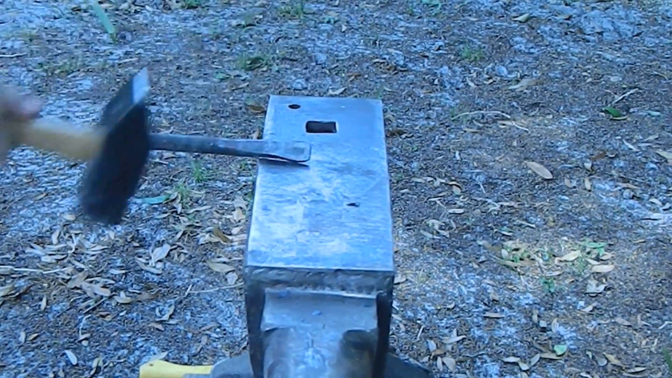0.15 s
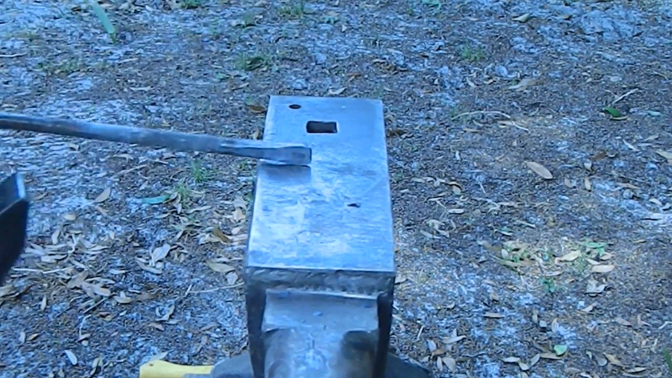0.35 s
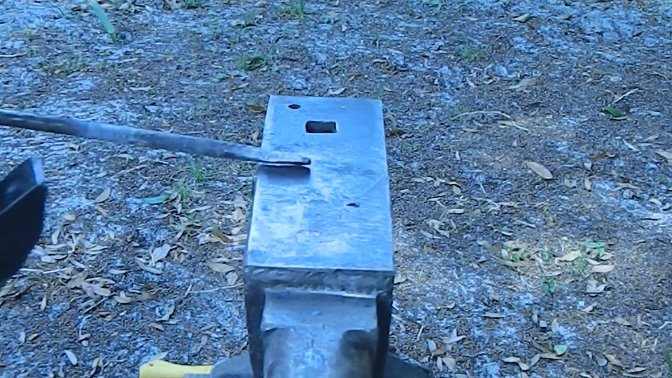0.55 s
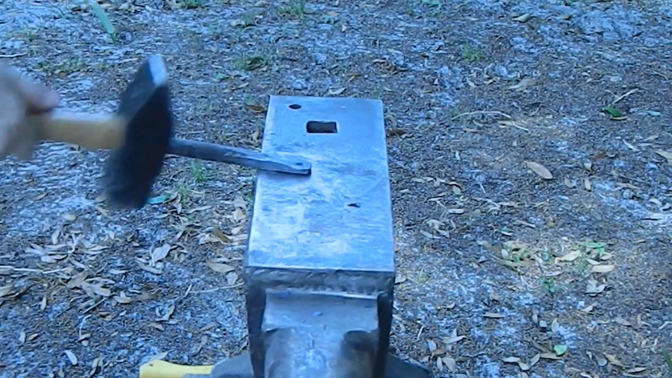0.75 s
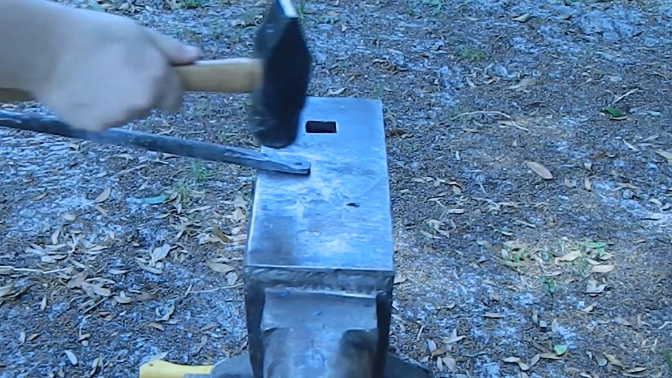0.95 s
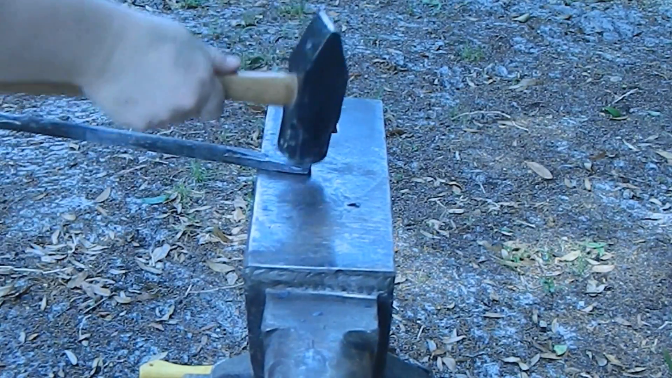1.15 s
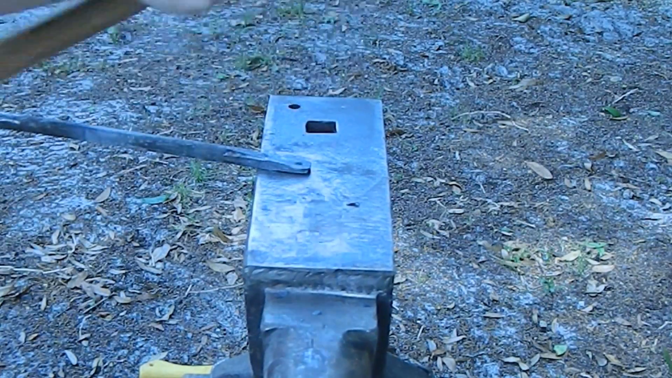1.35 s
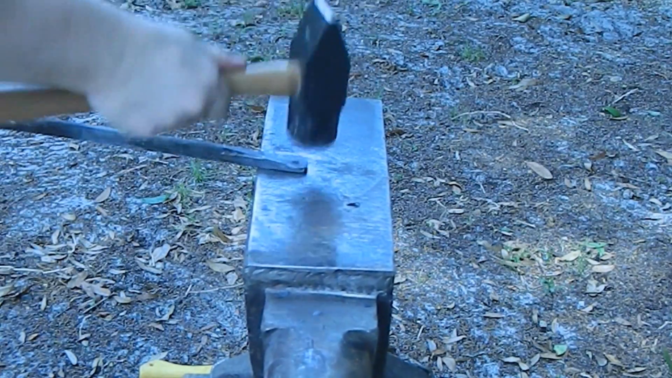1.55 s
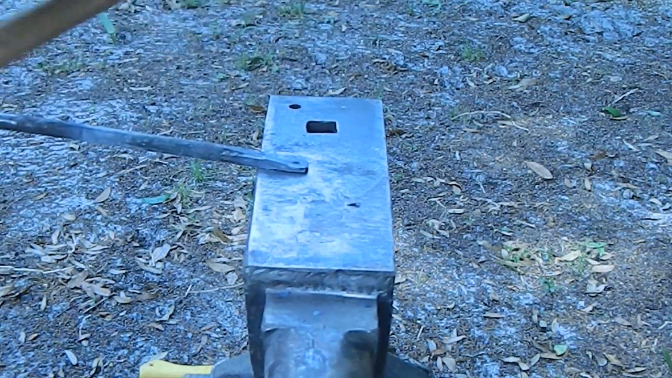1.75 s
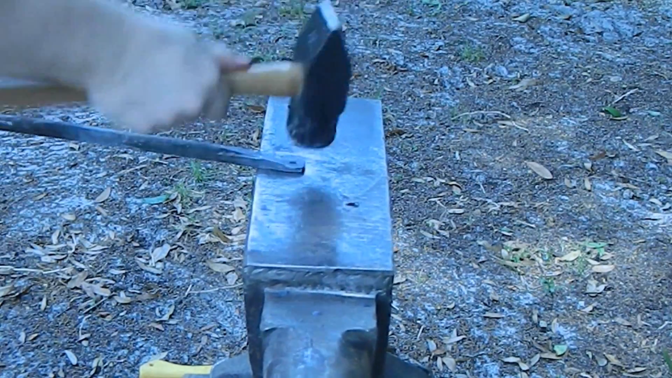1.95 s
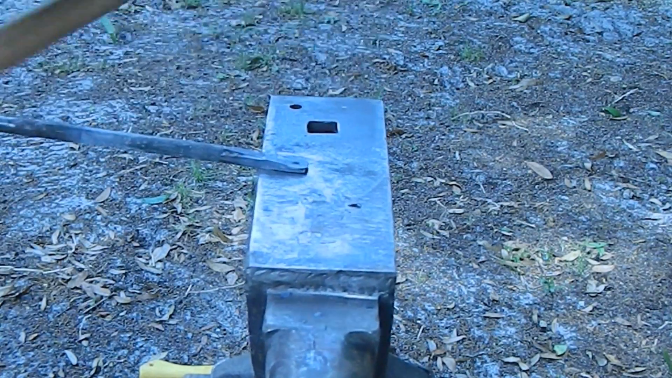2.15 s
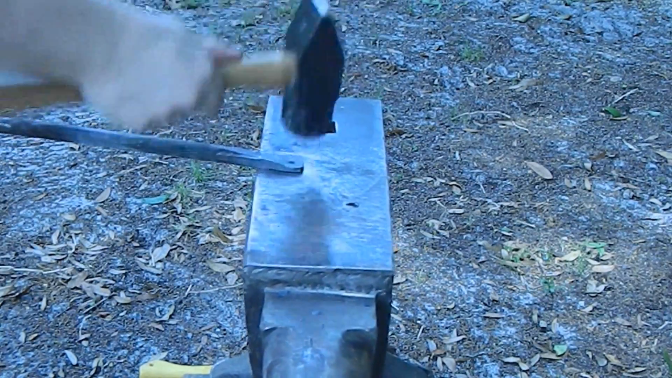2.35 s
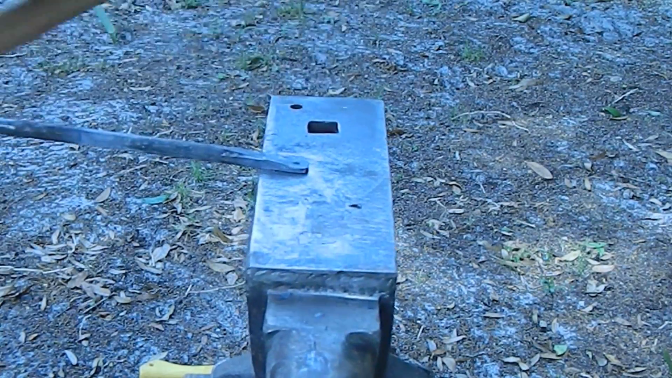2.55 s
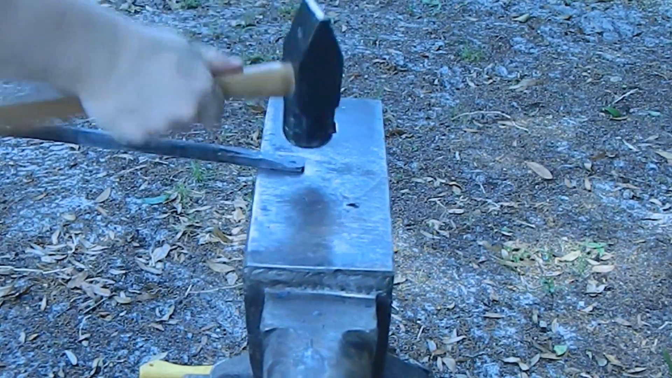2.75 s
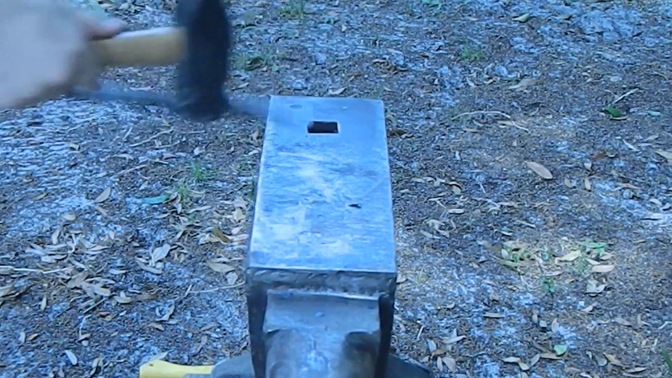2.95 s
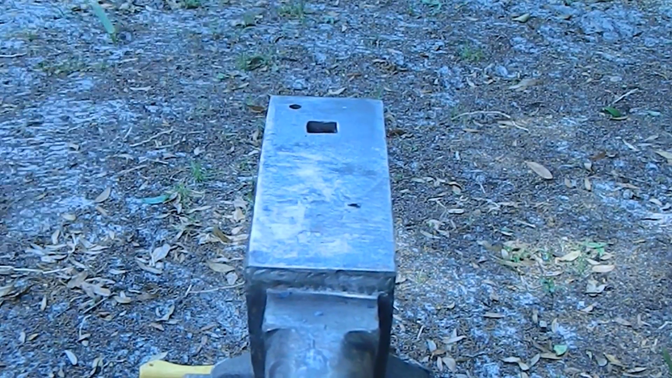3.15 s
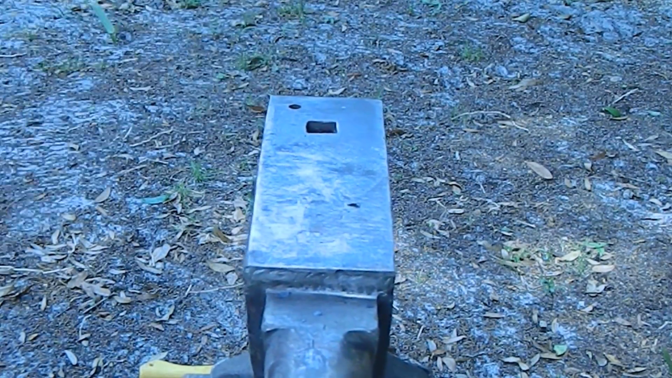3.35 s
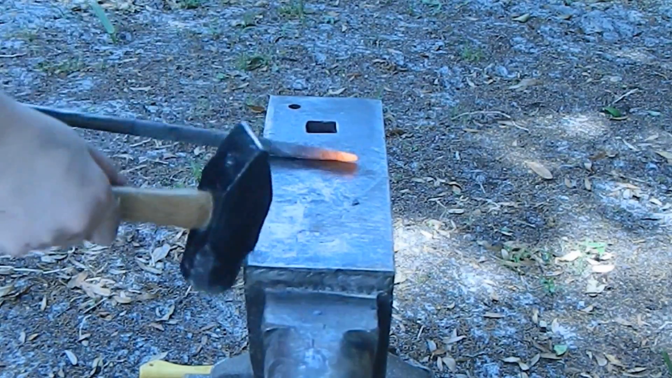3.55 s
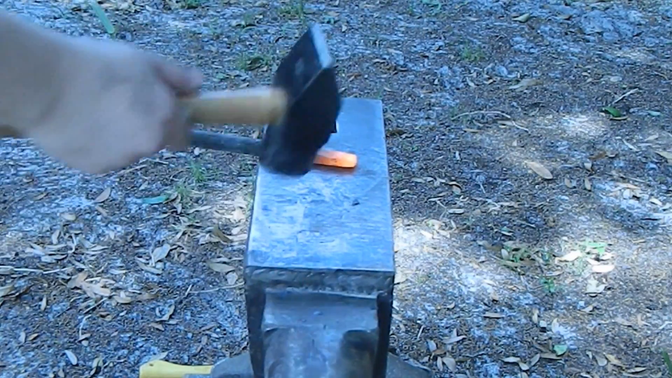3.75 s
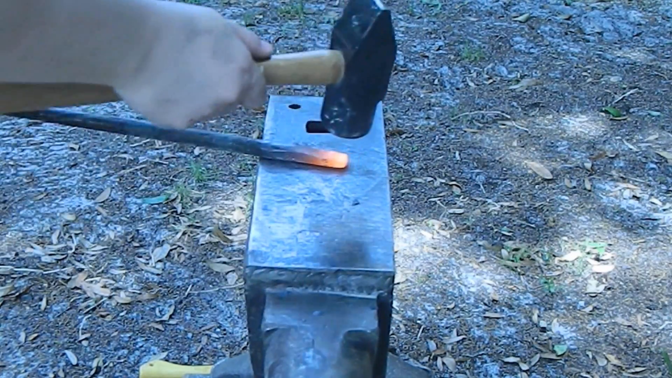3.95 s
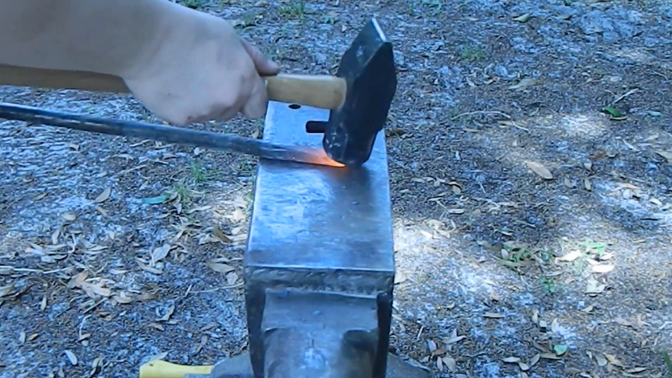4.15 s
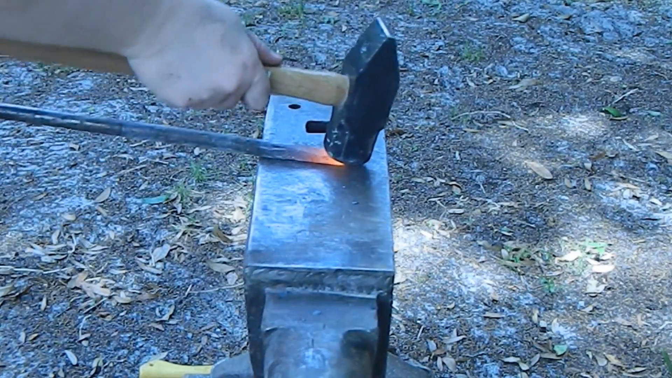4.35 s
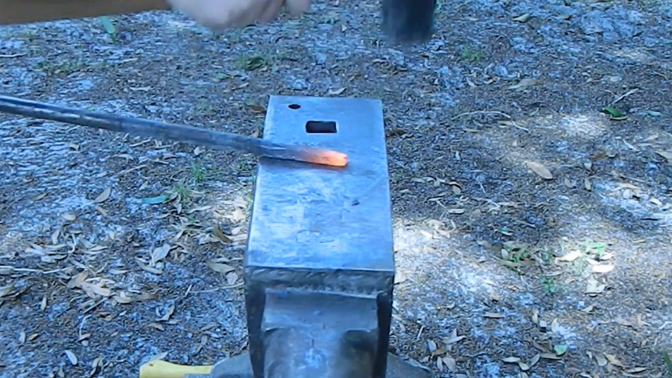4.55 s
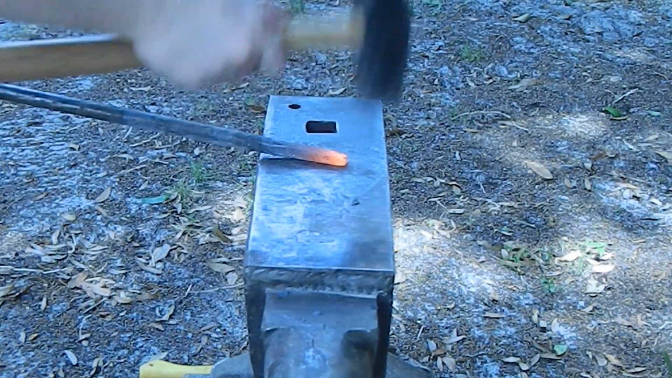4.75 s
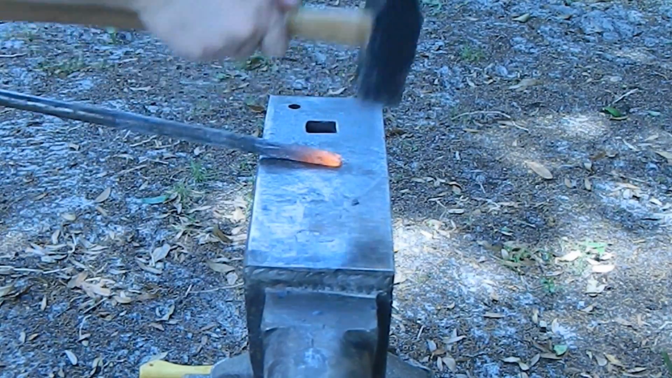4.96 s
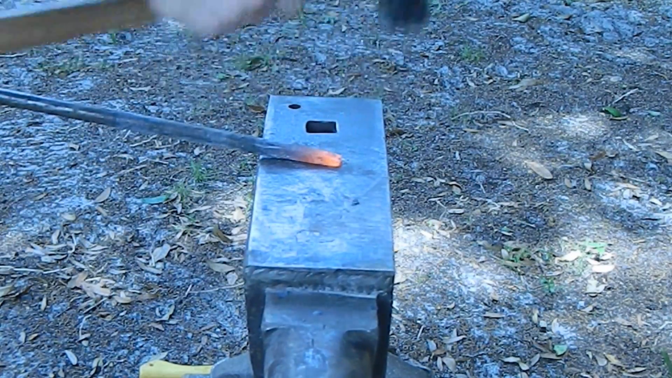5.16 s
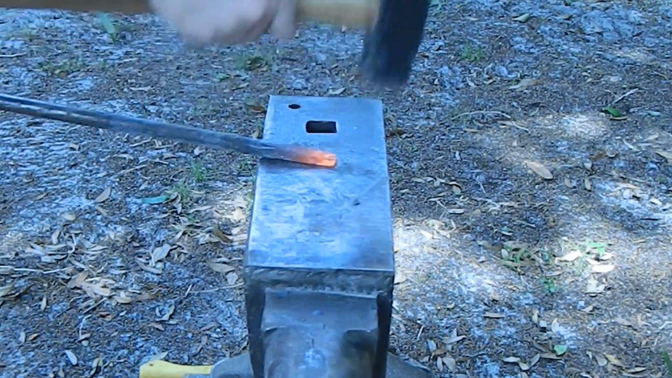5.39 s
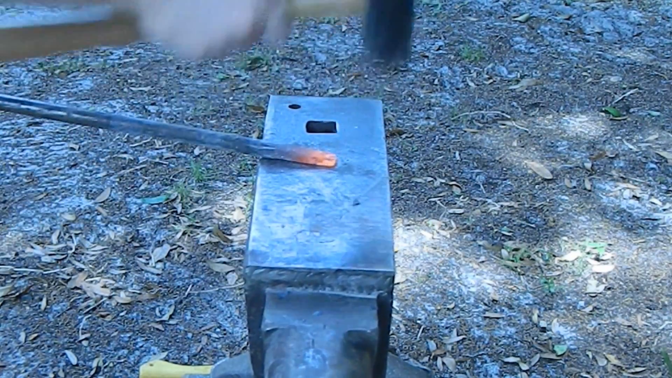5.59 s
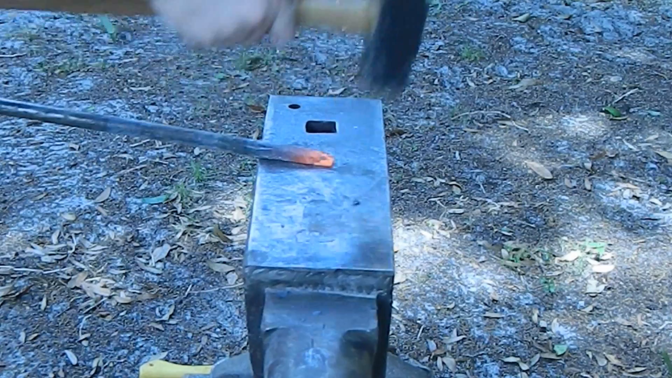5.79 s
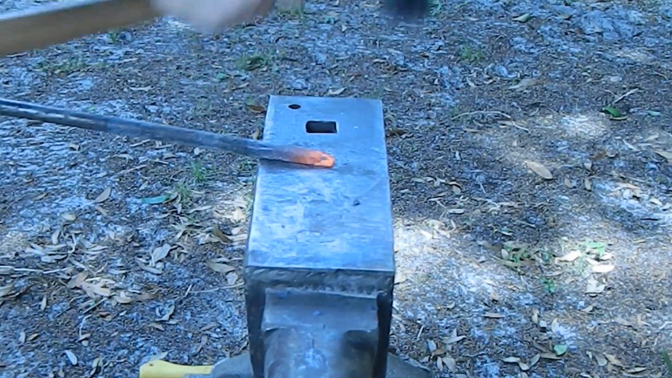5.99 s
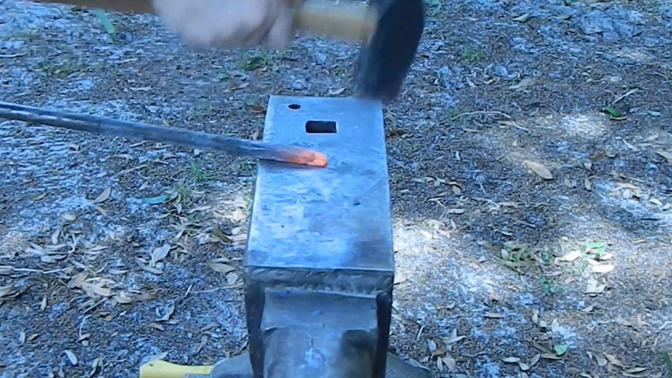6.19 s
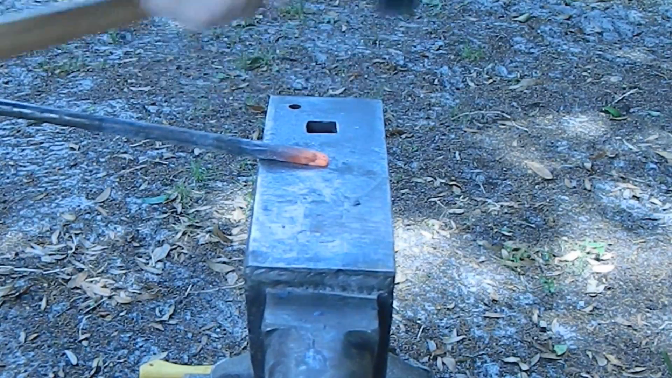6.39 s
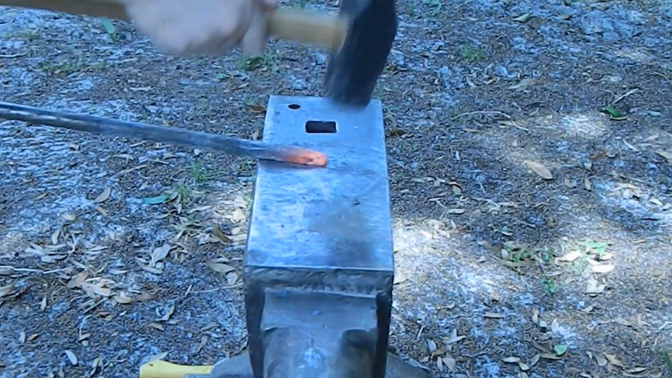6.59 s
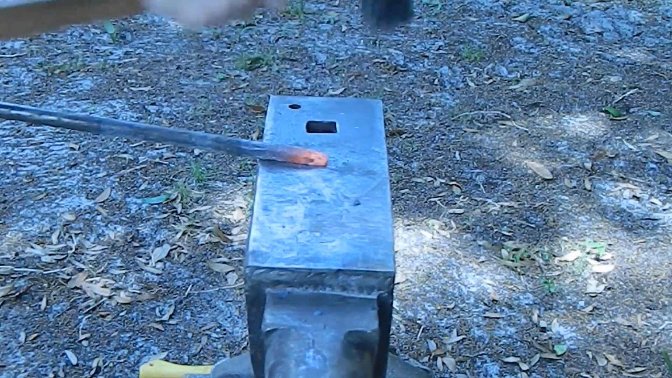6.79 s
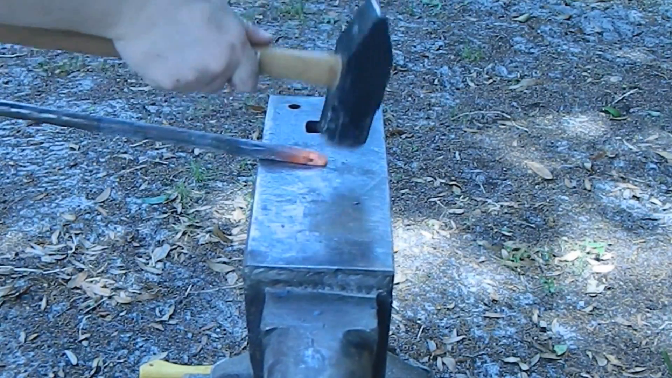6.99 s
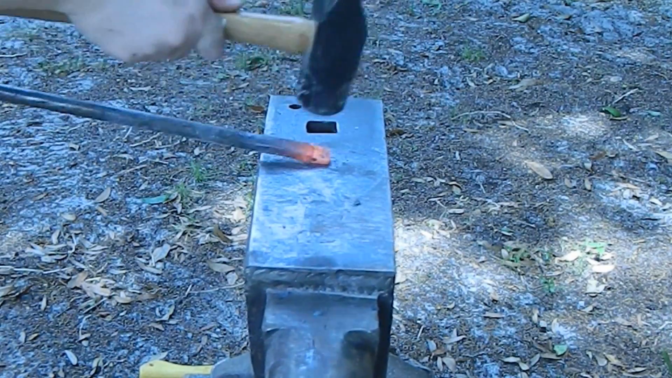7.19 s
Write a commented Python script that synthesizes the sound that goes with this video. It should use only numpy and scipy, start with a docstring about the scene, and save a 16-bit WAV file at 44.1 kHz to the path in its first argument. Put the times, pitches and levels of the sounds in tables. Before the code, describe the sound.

Close, outdoor forging: a hammer hits hot steel on an anvil, with sharp clanks, thin high ringing and a small thump from the stand. A fading ring and two faint bar taps lead into five blows. A pause follows, where the machine hum and hiss abruptly rise, then a few rattling taps and six harder blows at the same pace. Early on, a far bird gives faint falling whistles.

```python
"""A hand hammer forges a hot steel bar on an anvil in a yard. A blow rings away, and a far bird starts its
falling whistles over machine hum, rumble and hiss that swell and sink. Two light taps of the bar lead into
five blows: hot steel slaps dully, the stand thumps, hammer head, bar and anvil ring, the yard echoes.
In the pause the sound cuts to a second shot, with a louder background and a lower hum; four more taps
lead into six more blows. Two close microphone ports hear it."""
import sys
import numpy as np
from scipy import signal
from scipy.fft import rfft, irfft, next_fast_len
from scipy.io import wavfile

SR = 44100
rng = np.random.default_rng(int(sys.argv[2]) if len(sys.argv) > 2 else 0)


def log_audio(samples):
    """Write samples as a 16-bit WAV file to the path given in sys.argv[1]."""
    # one column per channel
    frames = np.atleast_2d(samples).T
    # limit to full scale, then quantise
    limited = np.clip(frames, -1, 1)
    pcm = np.round(limited * 32767).astype(np.int16)
    wavfile.write(sys.argv[1], SR, pcm)


N = 318843
LEAD = 11025   # samples of run-in, for the blow that lands before the start


def amp(db):
    """dB to gain."""
    return 10 ** (np.asarray(db) / 20)


def rms_one(x):
    """Scale to rms 1."""
    return x / np.sqrt(np.mean(x ** 2) + 1e-20)


def at_hz(table, hz, column=1):
    """Read one column of a table on a log-frequency axis."""
    table = np.array(table)
    return np.interp(np.log(hz), np.log(table[:, 0]), table[:, column])


def ring(clicks, hz, t60):
    """Resonator: a unit click sets a sine of height 1 ringing."""
    r, w = amp(-60 / (t60 * SR)), 2 * np.pi * hz / SR
    return signal.lfilter([0, np.sin(w)], [1, -2 * r * np.cos(w), r * r], clicks + 1e-18)


def decay(at, heights, t60):
    """Envelope that jumps at the samples `at` and dies away."""
    clicks = np.zeros(N + LEAD)
    clicks[at] = heights
    return signal.lfilter([1], [1, -amp(-60 / (t60 * SR))], clicks + 1e-18)


def drift(rate_hz, size):
    """Slow random modulation of rms about 1."""
    knots = rng.standard_normal(int(size / SR * 40) + 2)   # 40 a second
    smooth = signal.lfilter([1], [1, -np.exp(-2 * np.pi * rate_hz / 40)], knots)
    return np.interp(np.arange(size) * 40 / SR, np.arange(len(knots)), rms_one(smooth))


def bands(lo_hz, hi_hz, size):
    """Half-octave bands of stereo noise (mid, side) with their centres."""
    edges = np.geomspace(lo_hz, hi_hz, int(2 * np.log2(hi_hz / lo_hz)) + 2)
    white = rng.standard_normal((2, 2, size))
    for k, (low, high) in enumerate(zip(edges, edges[1:])):
        sos = signal.butter(2, [low, high], "band", fs=SR, output="sos")
        yield np.sqrt(low * high), signal.sosfilt(sos, white[k % 2])


def noise_bed(spectrum, flicker_db):
    """Stereo noise of a given colour, each band flickering alone; rms 1."""
    # likeness of left and right: f/Hz, correlation
    likeness = [(60, 0.5), (180, 0.6), (550, 1), (1650, 0.6), (4970, 1), (15000, -0.11)]
    out = 0
    for hz, (mid, side) in bands(spectrum[0][0], spectrum[-1][0], N):
        alike = np.clip(at_hz(likeness, hz), 0, 1)
        gain = amp(at_hz(spectrum, hz) + flicker_db * drift(12, N))
        out += gain * (np.sqrt(1 + alike) * mid + np.sqrt(1 - alike) * side * [[1], [-1]])
    return rms_one(out)


def machine_hum(cut_s):
    """Wavering machine tones: noise through narrow resonances, one set on each side of the cut."""
    # hum before and after the cut: f/Hz, width/Hz, level/dB
    early = [(122.6, 9.8, -3), (238.7, 3.7, -7), (293, 7.6, -13), (588.3, 6.5, -14)]
    late = [(84.44, 1.6, -8), (118.3, 6.2, -9), (158.1, 10, -5), (251.7, 33, -10.5)]
    hums = np.zeros((2, N))
    for hum, tones in zip(hums, (early, late)):
        for hz, width, db in tones:
            hum += amp(db) * rms_one(ring(rng.standard_normal(N), hz, t60=2.2 / width))
    return np.where(np.arange(N) / SR < cut_s, *hums)


def background():
    """Far rumble and hum ride one fader; mid noise rides another, which the hiss follows more widely."""
    # fader moves: t/s, rumble/dB, mid noise/dB
    faders = [(0, -71, -79.5), (0.35, -64, -76), (0.63, -59.5, -68), (1.001, -54.5, -61), (1.33, -46, -55),
              (1.542, -42, -51.5), (1.64, -59.5, -54), (1.9, -58, -63), (2.3, -64.5, -67.5),
              (3.2, -63, -70.5), (3.537, -55.5, -66.5), (3.552, -35.5, -50.5), (3.85, -39.5, -50.5),
              (4.001, -34.5, -48), (4.15, -35.5, -49.5), (4.78, -37.5, -49.5), (5.0, -45, -58),
              (5.2, -44, -55), (5.57, -47.5, -57), (6.4, -52.5, -60.5), (7.17, -55.5, -64.5)]
    # colours of the three beds: f/Hz, density/dB
    rumble_eq = [(15, -50), (25, -32), (64, -4), (81, 7), (114, -3.5), (162, -4.5), (195, -10.5),
                 (242, -8.5), (384, -12), (500, -18.5), (650, -47.5), (1100, -120)]
    mids_eq = [(240, -35), (400, -4), (594, -1), (731, -1.5), (843, -4), (2470, -8), (3910, -19.5),
               (5500, -23), (7150, -52), (12100, -120)]
    hiss_eq = [(2940, -24), (5000, 4.5), (8120, 4), (15200, -3.5), (16300, -17), (16500, -49)]
    times, *levels = np.transpose(faders)
    rumble_db, mids_db = [np.interp(np.arange(N) / SR, times, db) for db in levels]
    hiss_db = -57.5 + 1.32 * (mids_db + 49.5)
    hum = machine_hum(cut_s=3.54)
    rumble = amp(-3.5) * noise_bed(rumble_eq, flicker_db=3)
    mids = amp(mids_db + 3) * noise_bed(mids_eq, flicker_db=0.36)
    hiss = amp(hiss_db) * noise_bed(hiss_eq, flicker_db=0)
    return amp(rumble_db) * (rumble + hum) + mids + hiss


def bird():
    """A far whistle: a slightly wavering sine that slides down."""
    # shape of one whistle: t/s, f/Hz, level/dB
    contour = [(0, 2720, -8), (.03, 2680, 4), (.12, 2540, 3), (0.269, 2450, 3), (0.35, 2320, -2),
               (.5, 2090, 3.5), (0.559, 2020, -23.5)]
    # whistle cues: t/s, level/dB
    cues = [(.18, -73.5), (1.07, -61), (2.081, -74), (2.951, -68.5)]
    times, hz, db = np.transpose(contour)
    t = np.arange(round(times[-1] * SR)) / SR
    out = np.zeros(N)
    for start, level_db in cues:
        pitch = np.interp(t, times, hz) * (1 + 0.0036 * drift(7.4, len(t)))
        gain = amp(level_db + np.interp(t, times, db) + 1.7 * drift(17, len(t)))
        out[round(start * SR):][:len(t)] += gain * np.sin(2 * np.pi * np.cumsum(pitch) / SR)
    return out


def yard(x):
    """Add a few dull echoes and a scattered tail that dies band by band."""
    # scattered tail: f/Hz, level/dB, nominal t60/s
    reverb = [(100, -33, 0.28), (297, -33.5, 0.15), (770, -40.5, 0.33), (2115, -36.5, 0.27),
              (4730, -38.5, 0.37), (9300, -32, 0.28), (16700, -39, 0.22)]
    # echoes off ground and walls: delay/s, level/dB
    echoes = [(.0033, -11), (0.023, -34.5), (.043, -25.5)]
    t = np.arange(SR // 2) / SR
    tail = 0
    for hz, (mid, side) in bands(81.5, 15500, len(t)):
        fall_db = 60 * t / at_hz(reverb, hz, column=2)
        near, far = amp(-1.6 * fall_db), amp(-13 - 0.57 * fall_db)   # far trees answer later and longer
        fade = amp(at_hz(reverb, hz)) * (near + far) * np.minimum(t / 0.0033, 1)
        tail += fade * (mid + 0.28 * side * [[1], [-1]])
    dull, out = signal.lfilter([.3], [1, -.7], x), x.copy()
    for delay, db in echoes:
        out[round(delay * SR):] -= amp(db) * dull[:-round(delay * SR)]
    return out + signal.fftconvolve(x[None], tail, axes=1)[:, :len(x)]


def struck(at, level_db, modes, spread_db, chatter=0):
    """Hits at samples `at` wake each mode with a strength of its own; chatter smears the attack."""
    out, chance = 0, rng.standard_normal((len(at), len(modes)))
    grit = rng.standard_normal((min(len(modes), 3), N + LEAD))
    for k, (hz, db, t60) in enumerate(modes):
        clicks = np.zeros(N + LEAD)
        clicks[at] = amp(level_db + db + spread_db * chance[:, k])
        settling = decay(at, chatter * clicks[at], t60=0.07) * grit[k % len(grit)]
        out += ring(clicks + settling, hz, t60)
    return out


def stand_thump(at, level_db):
    """The stand thumps under the anvil, 2 ms after each hit."""
    # stand modes: f/Hz, level/dB, t60/s
    modes = [(117.4, -11, 0.16), (260, 5.5, 0.082), (279, -4, 0.13), (624, 3.5, 0.036)]
    thump = struck(at + 90, level_db, modes, spread_db=2.9)
    return signal.sosfilt(signal.butter(2, 70, "high", fs=SR, output="sos"), thump)


def anvil_ring(at, levels_db):
    """Long thin tones that fade in just after each hit; each new hit stops the old ring."""
    # anvil modes: f/Hz, level/dB, t60/s, fade-in/s, flutter/dB
    modes = [(3975, -4.5, 0.48, 0.0027, 4.5), (6368, -9.5, 1.37, 0.012, 0.5), (11180, -10.5, 1, 0.055, 1.6)]
    n = np.arange(N + LEAD)
    last_hit = np.maximum(np.searchsorted(at, n, "right") - 1, 0)
    since = np.maximum(n - at[last_hit], 0) / SR
    out = 0
    for level_db, (hz, db, t60, rise, flutter_db) in zip(levels_db, modes):
        fade_db = level_db[last_hit] + db - 60 * since / t60 + flutter_db * drift(18, len(n))
        out += amp(fade_db) * (1 - np.exp(-since / rise)) * np.sin(2 * np.pi * hz * since)
    return out


def bar_ring(at, ring_db, knock_db, rattle):
    """The bar clangs and rings, chattering on the anvil face."""
    # bar modes: f/Hz
    pitches = [3050, 4827, 5109, 6915, 7230, 7752, 8495, 8915, 9911, 10100, 11860]
    # their ring: level/dB, t60/s
    decays = [(-3.5, 0.05), (-3, 0.11), (-6.5, 0.12), (-3, 0.1), (-5, .06), (-8.5, 0.068), (-5.5, 0.089),
              (-12, 0.071), (-10, 0.18), (-10.5, 0.078), (-15.5, 0.086)]
    # the bar's lowest clang: f/Hz, level/dB, t60/s
    knock = [(1524, -10.5, 0.027)]
    modes = np.column_stack([pitches, decays])
    low = struck(at, ring_db, modes[:3], spread_db=3, chatter=0.068 * rattle)
    high = struck(at, ring_db - 7.5, modes[3:], spread_db=-1, chatter=0.082 * rattle)
    return low + high + struck(at, knock_db, knock, spread_db=2.5, chatter=0.071 * rattle)


def bar_clatter(at, level_db):
    """The jolted bar clatters: a short noise burst on each hit."""
    # clatter colour: f/Hz, density/dB
    eq = [(120, -29), (200, 0), (2700, -0.5), (3370, -9.5), (4270, -17), (4680, -13.5), (5330, -0.5),
          (6880, -7.5), (8740, -10), (16000, -18.5)]
    noise = sum(amp(at_hz(eq, hz)) * mid for hz, (mid, _) in bands(198.3, 15630, N + LEAD))
    return decay(at, amp(level_db), t60=0.029) * rms_one(noise)


def hammer_ring(at, level_db, hardness_db):
    """Each head mode pings and leaves a faint detuned tail; the steel's hardness tilts their balance."""
    # head modes: f/Hz
    pitches = [3402, 4179, 5335, 6127]
    # their ring: ping/dB, t60/s, tail/dB, tail t60/s
    decays = [(10.5, 0.067, -17, 0.38), (3.5, 0.071, -22, 0.27), (5.5, 0.096, -21.5, 0.35),
              (1, 0.16, -21, 0.23)]
    # their balance: trim/dB, share of the hardness
    balance = [(-5.5, 1.1), (2, .3), (0, .25), (1, -0.17)]
    out = 0
    for hz, (db, t60, tail_db, tail_t60), (trim_db, share) in zip(pitches, decays, balance):
        grip = amp(3.2 * drift(6, N + LEAD))   # the hand damps the head unevenly
        pair = [(hz, db, t60), (hz + 6, tail_db, tail_t60)]
        mode_db = level_db + trim_db + share * hardness_db
        out += grip * struck(at, mode_db, pair, spread_db=1.1, chatter=0.026)
    return out


def steel_slap(at, slap_db, edge_db, crack_db):
    """Hot steel takes the hit with a dull slap, a bright edge and a top crack, gone in milliseconds."""
    # modes of the three layers: f/Hz, level/dB, t60/s
    slap = [(1170, -5, 0.0045), (1750, 3, 0.0046)]
    edge = [(2564, 12.5, 0.0022), (6100, -4, 0.0093)]
    crack = [(8710, 8.8, 0.0037), (12090, 6.2, 0.0092), (15500, 3, 0.002)]
    layers = (slap_db, slap), (edge_db, edge), (crack_db, crack)
    return sum(struck(at, db, modes, spread_db=0.5) for db, modes in layers)


def bar_taps():
    """Cues for light taps of the bar on the anvil face: loose, it rattles more than when pinned."""
    # taps: t/s, knock/dB, ring/dB, stand thump/dB
    taps = [(.706, -42, -52.5, -58), (.729, -40.5, -56.5, -64), (3.989, -36.5, -58, -40),
            (4.216, -20.5, -47, -33), (4.236, -9, -32, -41), (4.304, -13.5, -31.5, -35)]
    return [dict(t=t, slap=knock - 6.5, edge=ring_db + 8.5, crack=ring_db - 25, thump=thump, knock=knock,
                 bar=ring_db, head=ring_db - 2.5, hardness=0, rattle=2.24,
                 anvil=(ring_db - 4, ring_db - 28, ring_db - 40))
            for t, knock, ring_db, thump in taps]


def hammer_blows():
    """Cues for blows that pin the bar: harder steel gives more edge and less thump."""
    # blows: t/s, slap/dB, crack/dB, hammer and bar ring/dB, steel hardness/dB,
    # upper two anvil tones/dB, their lean to the lower one/dB
    blows = [(-.15, -13.5, -53, -37, 3.5, -40, -0.5), (1.166, -19, -42.5, -36, -7, -49, -2),
             (1.587, -6.5, -19, -27.5, 1.5, -48.5, -8), (1.982, -7.5, -22.5, -34, 4, -40, -5.5),
             (2.38, -11, -26.5, -30.5, 8, -38, -11), (2.778, -10, -32, -31.5, 7.5, -47, -15),
             (4.85, -1, -18, -29, -10, -39.5, -8), (5.287, -2, -27, -28.5, -5.5, -43, 2.5),
             (5.695, -4.5, -39, -30, -6.8, -37, -2.2), (6.119, -4, -24, -29, -2.5, -39, 4),
             (6.517, -7, -28.5, -33, -2.5, -38, -3.5), (6.919, -7, -24, -31, -5, -51, 11)]
    return [dict(t=t, slap=slap, edge=slap - 9 + hardness, crack=crack,
                 thump=-22 + 0.53 * slap - 0.19 * hardness, knock=slap - 17.5,
                 bar=ring_db - 1, head=ring_db, hardness=hardness, rattle=1,
                 anvil=(ring_db - 5.5 + hardness, upper + lean, upper - lean))
            for t, slap, crack, ring_db, hardness, upper, lean in blows]


def forging():
    """Every blow and tap sounds anvil, hammer, bar and stand together."""
    cues = sorted(hammer_blows() + bar_taps(), key=lambda cue: cue["t"])
    hits = {part: np.array([cue[part] for cue in cues]) for part in cues[0]}
    at = np.round(hits["t"] * SR).astype(int) + LEAD + 30
    steel = anvil_ring(at, hits["anvil"].T)
    steel -= steel_slap(at, hits["slap"], hits["edge"], hits["crack"])
    steel += hammer_ring(at, hits["head"], hits["hardness"])
    steel += bar_ring(at, hits["bar"], hits["knock"], hits["rattle"])
    steel += bar_clatter(at, hits["slap"] - 8.5)
    low_cut = signal.butter(4, 260, "high", fs=SR, output="sos")
    return signal.sosfilt(low_cut, steel) + stand_thump(at, hits["thump"])


def scene():
    """The forging in its yard, over the background and the bird."""
    return yard(forging())[:, LEAD:] + background() + bird()


def record(dry):
    """The two ports differ in level and phase with pitch; peaks are rounded, the top is cut."""
    # microphone ports: f/Hz, left minus right/dB, left phase lead/rad
    mismatch = [(50.2, -7, 1), (249, -0.5, 0.75), (690, 2.5, 0.53), (1500, 1.5, 0.48), (3260, 4.5, 0.78),
                (5700, 11, -1), (5940, 0.5, -1.33), (7790, 3.5, -1.32), (10300, -1.5, -1.3),
                (16000, -3, -0.73)]
    size = next_fast_len(N + 4096)
    hz = np.maximum(np.arange(size // 2 + 1) * SR / size, 1)
    half = amp(at_hz(mismatch, hz) / 2) * np.exp(.5j * at_hz(mismatch, hz, column=2))
    ports = irfft(rfft(dry, size) * np.array([half, 1 / half]), size)[:, :N]
    high_cut = signal.cheby2(16, 95, 17100, fs=SR, output="sos")
    return signal.sosfilt(high_cut, 1.3 * np.tanh(ports / 1.3))


dry = scene()
out = record(dry)
log_audio(out)
```